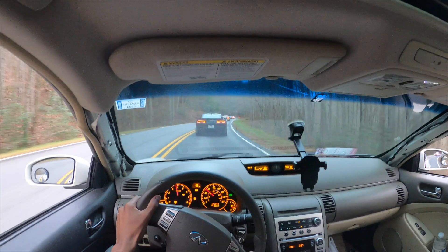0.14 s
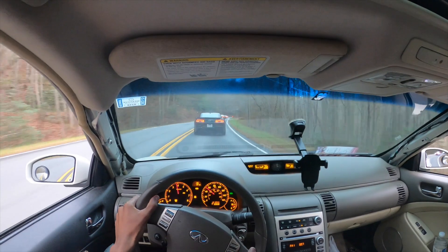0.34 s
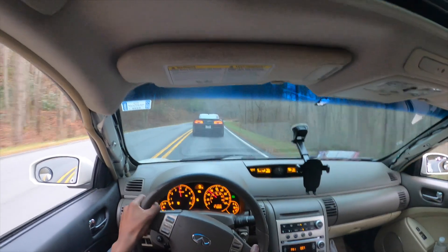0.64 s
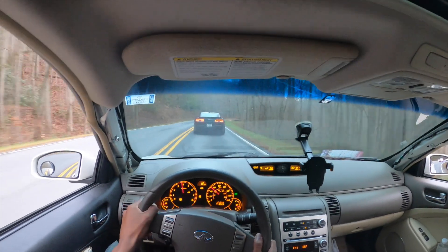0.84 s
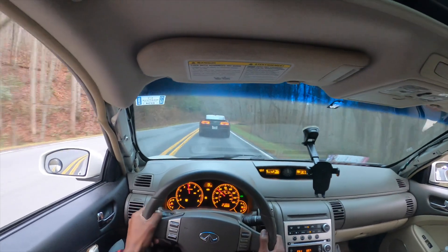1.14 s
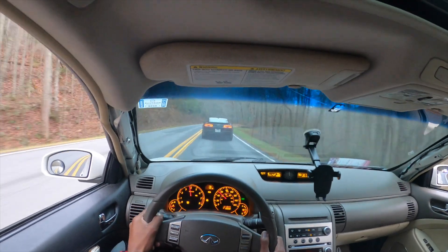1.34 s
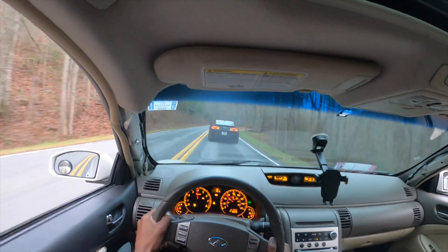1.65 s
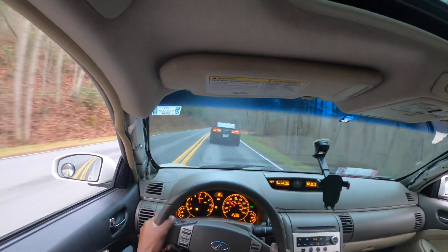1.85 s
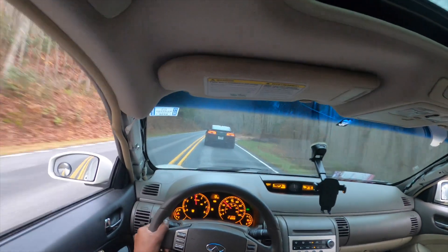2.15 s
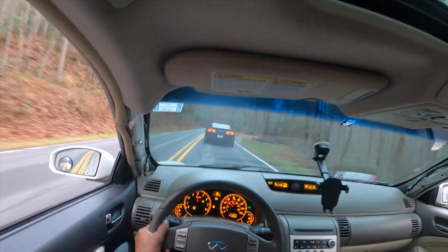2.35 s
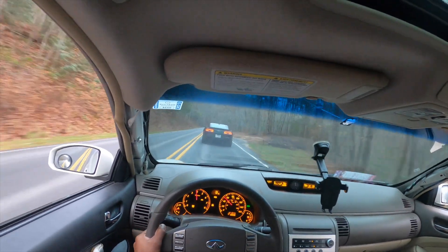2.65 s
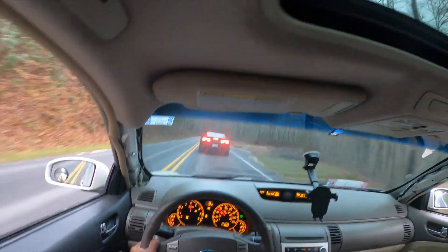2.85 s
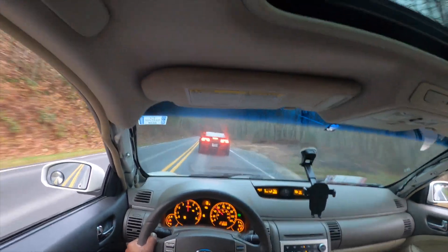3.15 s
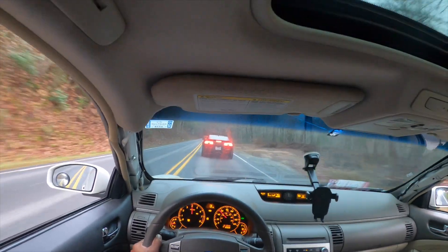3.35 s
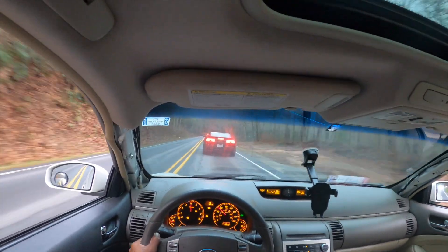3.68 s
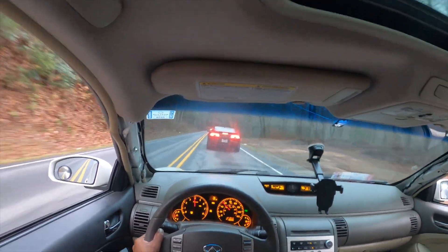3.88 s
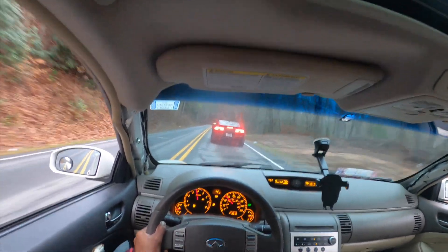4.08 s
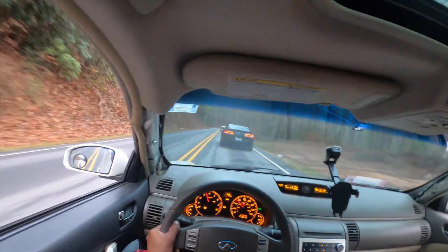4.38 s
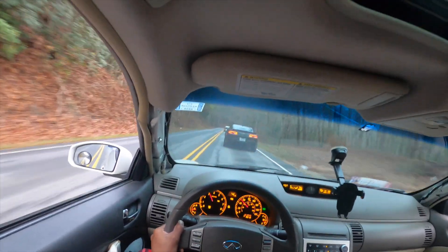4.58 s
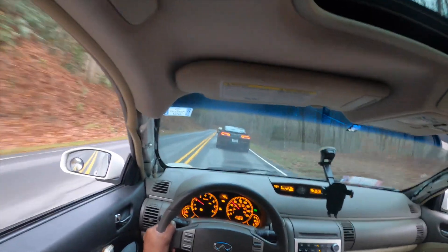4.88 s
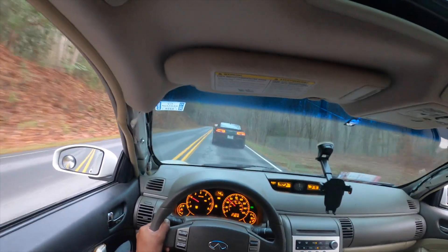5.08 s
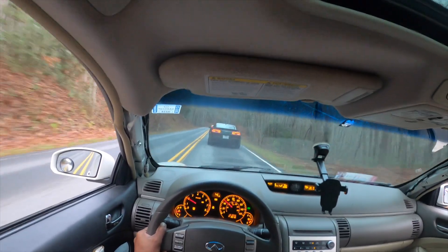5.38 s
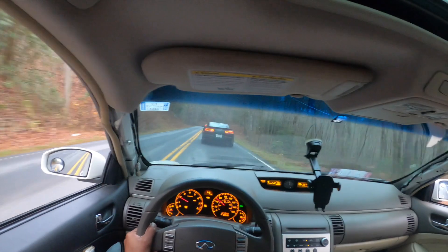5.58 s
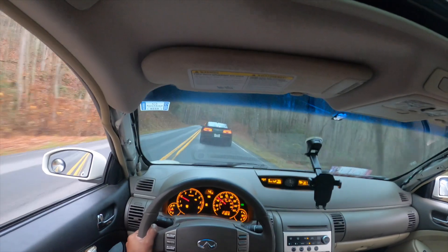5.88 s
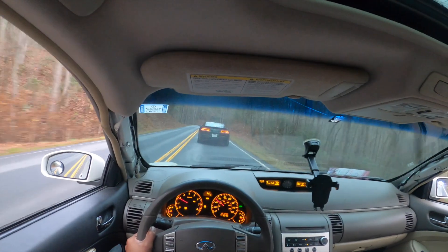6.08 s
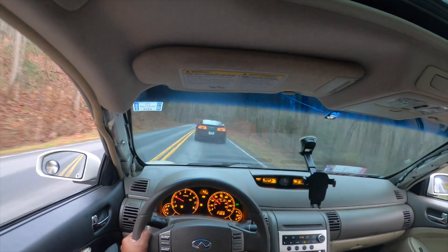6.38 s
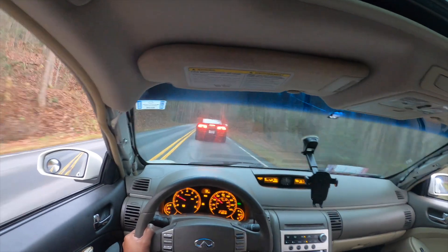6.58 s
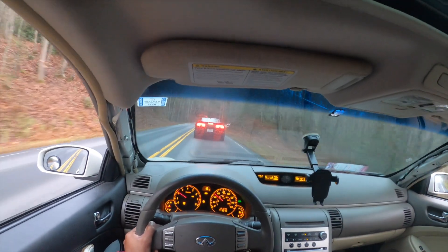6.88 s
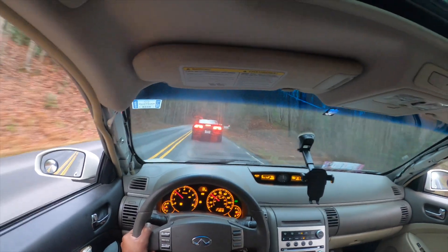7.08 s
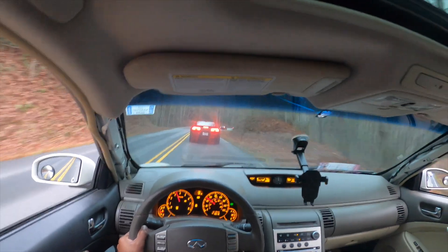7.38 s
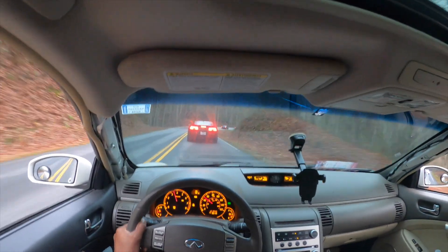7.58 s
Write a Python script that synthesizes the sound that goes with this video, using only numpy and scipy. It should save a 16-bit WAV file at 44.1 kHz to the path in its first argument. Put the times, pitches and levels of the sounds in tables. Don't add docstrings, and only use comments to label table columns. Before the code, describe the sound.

Cabin view of a brisk road drive: droning, raspy engine, rumbling road, rattling plastic, a hard crack, lower revs, then a late throttle stab.

```python
import sys
import numpy as np
from scipy import signal
from scipy.io import wavfile
from scipy.ndimage import uniform_filter1d

SR = 44100
rng = np.random.default_rng(int(sys.argv[2]) if len(sys.argv) > 2 else 0)


def undo_db(level):
    steps = np.asarray(level, float) / 20
    return 10 ** steps


def master_out(mix):
    frames = np.transpose(np.atleast_2d(mix))
    ceiling = np.clip(frames, -1, 1)
    pcm = np.round(ceiling * 32767).astype(np.int16)
    wavfile.write(sys.argv[1], SR, pcm)


N = 340893


def evened(x):
    return x / np.sqrt(np.mean(x ** 2) + 1e-20)


def read(points, hz):
    f, value = np.transpose(points)
    return np.interp(np.log(hz + 1), np.log(f + 1), value)


def curves(rows):
    s, *columns = np.transpose(rows)
    return [np.interp(np.arange(N) / SR, s, c, c[0], c[-1]) for c in columns]


def humps(rows):
    t = np.arange(N) / SR
    return sum(db * np.cos(np.pi / 2 * np.clip((t - s) / half, -1, 1)) ** 2 for s, half, db in rows)


def drift(seconds):
    coarse = rng.standard_normal(N // 64 + 2)
    size = max(int(seconds * SR / 64), 2)
    coarse = evened(uniform_filter1d(uniform_filter1d(coarse, size), size))
    return np.interp(np.arange(N) / 64, np.arange(len(coarse)), coarse)


def add(mix, s, sound):
    part = mix[..., round(s * SR):][..., :sound.shape[-1]]
    part += sound[..., :part.shape[-1]]


# f/Hz, left-right likeness [0-1]
LIKENESS = [(40, .95), (100, .9), (180, .97), (300, .82), (520, .86), (890, .78), (1520, .63), (2610, .5),
            (4500, .25), (9000, .3)]
# f/Hz, left minus right level/dB
LEAN = [(40, 1.2), (100, .6), (180, 1.2), (300, 2.5), (520, 3), (890, 4), (1520, 5), (2610, 5.5),
        (4500, 1.8), (9000, 1.8)]
# f/Hz, phase by which left leads [rad]
LEAD = [(40, -0.5), (180, -0.24), (600, -0.33), (1980, -1.2), (2760, -1.6)]


def bed(spectrum, patchy_db, size):
    hop = size // 4
    frames, hz = N // hop + 5, np.fft.rfftfreq(size, 1 / SR)
    a, b, c, d, patches = rng.standard_normal((frames, len(hz), 5)).T
    patches = uniform_filter1d(patches, size // 100, 0)
    patches = evened(uniform_filter1d(patches, 12000 // size, 1))
    same = np.clip(read(LIKENESS, hz), 0, 1)[:, None]
    left = a + 1j * b
    right = same * left + np.sqrt(1 - same ** 2) * (c + 1j * d)
    right = right * np.exp(-1j * read(LEAD, hz))[:, None]
    lean = undo_db(read(LEAN, hz) / 2)[:, None]
    colour = undo_db(read(spectrum, hz)[:, None] + patchy_db * patches)
    z = np.array([left * lean, right / lean]) * colour
    return evened(signal.istft(z, nperseg=size, noverlap=size - hop)[1][:, :N])


# t/s, firing tone level/dB, throttle [0-1]
LOAD = [(0, -12.5, 0.14), (.4, -15, 0.32), (1.8, -13.5, 0.3), (2.1, -11, 0.23), (2.3, -10, 0.3),
        (2.65, -10, 0.63), (2.9, -9.5, 0.67), (3.1, -17, 0.03), (3.3, -23, 0.37), (3.6, -19.5, 0.4),
        (3.9, -15, 0), (4.46, -16.5, 0.38), (4.63, -12.5, 1), (4.82, -14, 0.23), (6.95, -14, 0.26),
        (7.28, -11, 0.91), (7.46, -18.5, 0.6), (7.73, -18.5, .1)]
# t/s, half length [s], level/dB
LIFTS = [
    (1.93, 0.14, -9),
    (4.62, .065, -10.5),
    (6.76, 0.081, -11),
]
CRUISE_DB = -14


def firing():
    level_db, throttle = curves(LOAD)
    return level_db + humps(LIFTS), np.clip(throttle, 0, 1)


# t/s, firing rate f/Hz
SPEED = [(0, 175), (1.9, 176), (2.57, 182), (2.78, 190), (2.95, 184), (3.2, 187), (3.62, 185), (4.2, 170),
         (4.6, 146), (4.76, 115), (4.92, 99), (5.4, 93.3), (6.74, 94.5), (6.85, 106), (7.11, 125),
         (7.25, 150), (7.42, 166), (7.73, 156)]


def slowing(fall_hz_per_s):
    hz = uniform_filter1d(curves(SPEED)[0], size=4000)
    return np.clip(-np.gradient(hz) * SR / fall_hz_per_s, 0, 1)


RASP_ORDERS = (4, 5, 6, 7, 8)
# f/Hz, level/dB
PIPE = [(300, -32), (370, -25), (470, -29), (555, -23), (610, -40), (690, -40), (750, -27), (800, -28),
        (850, -41), (915, -27), (960, -37), (1100, -48), (1500, -40)]


def rasp(hz, throttle):
    closed_db = 24 * (1 - np.clip(throttle, 0, 1))
    overrun = slowing(80)
    lines = []
    for k in RASP_ORDERS:
        mute_db = 9 * overrun * np.clip(k * hz / 60 - 10, 0, 1)
        level_db = read(PIPE, k * hz) - closed_db - mute_db + 1.5 * drift(.1)
        lines.append((k, level_db, 1.5))
    return lines


# f/Hz, level/dB
MUFFLER = [(186, -28.5), (275, -35.5), (320, -46.5), (370, -37.5), (455, -41), (525, -39), (546, -42.5),
           (568, -38)]
# f/Hz, level/dB
BANKS = [(46, -37), (60, -41), (72, -41.5), (84, -28.5), (88, -28.5), (93, -34)]
# t/s, half length [s], level/dB
LUMPS = [
    (3.62, .26, 11.5),
    (5.8, 0.08, 8.5),
    (7.5, .1, 11),
]
UNEVEN_SIXTHS = (2, 4, 5, 8, 9)
UNEVEN_DB = [-13, -8, -9, -5, -8]


def engine():
    hz = uniform_filter1d(curves(SPEED)[0], size=900) * (1 + .0015 * drift(.12))
    firing_db, throttle = firing()
    falling = slowing(20)

    opened_db = 14.5 * throttle + 0.86 * (curves(LOAD)[0] - CRUISE_DB)
    second_db = read(MUFFLER, 2 * hz) + opened_db
    third_db = read(MUFFLER, 3 * hz) + opened_db - .5 - 5 * falling

    half_db = read(BANKS, hz / 2) - 1.8 * np.maximum(firing_db - CRUISE_DB, 0) + 2 * drift(0.11)
    half_db += humps(LUMPS) - 5 * falling

    # (multiple of the firing rate, level dB, flutter dB)
    lines = [
        (1, firing_db, 0.71),
        (2, second_db + 0.95 * drift(.08), 0.87),
        (3, third_db + 1.0 * drift(0.089), 1.6),
        (.5, half_db, 2.2),
        (2.5, np.minimum(third_db - 8, -41), 2.5),
        (3.5, np.minimum(third_db - 7, -39), 2.5),
    ]
    for k, db in zip(UNEVEN_SIXTHS, UNEVEN_DB):
        lines.append((k / 6, np.minimum(half_db, -28) + db, 2.5))
    lines += rasp(hz, throttle)

    turns = np.cumsum(hz * (1 + 0.0033 * drift(0.028))) / SR
    out = np.zeros((2, N))
    for k, level_db, flutter_db in lines:
        angle = 2 * np.pi * (k * turns + rng.random())
        mean_hz = k * np.mean(hz[:4 * SR])
        lean, lead = undo_db(read(LEAN, mean_hz) / 2), read(LEAD, mean_hz) / 2
        wave = np.array([lean * np.cos(angle + lead), np.cos(angle - lead) / lean])
        out += np.sqrt(2) * undo_db(level_db + flutter_db * drift(0.0087)) * wave
    return out


# t/s, side level/dB
WIDTH = [(0, -2), (4.3, -2.5), (4.47, -4), (4.5, -7), (4.65, -15), (4.8, -23.5), (5.0, -94), (7.73, -93.5)]


def wind_filter():
    return np.clip(-curves(WIDTH)[0] / 40, 0, 1)


# t/s, coarseness level/dB, undulation level/dB
SURFACE = [(0, 2, -9.5), (.3, 1.5, 3.5), (1.3, 4.5, 0.5), (1.9, 8, 0.5), (2.15, 5, -2), (2.55, -1.5, -4),
           (3.2, -1.5, -2), (3.6, 2.5, 0.5), (4.25, 1.5, 3.5), (4.6, 3, 7), (4.9, -1, -2), (5.6, 0.5, -6),
           (6.1, 0.5, 0), (6.85, 4.5, -3), (7.3, 2.5, -2), (7.62, -2, 4), (7.73, -4.5, 3)]
# t/s, half length [s], level/dB
DIPS = [
    (1.91, 0.073, 5),
    (4.65, 0.057, -3),
    (5.42, 0.15, 12),
    (7.73, 0.064, 6.5),
]
# f/Hz, level/dB per Hz
RUMBLE = [(8, -30), (14, -13), (20, -5), (26, 0), (30, -3), (36, -7), (47, -11), (58, -20), (90, -50),
          (300, -130)]
# f/Hz, level/dB per Hz
BOOM = [(35, -28.5), (55, -4), (90, -2.5), (130, 5.5), (200, -4.5), (270, -12), (340, -10), (450, -20),
        (800, -40), (2000, -120)]
# f/Hz, level/dB per Hz
ROAR = [(120, -34.5), (270, -2.5), (400, 2), (540, 0), (640, -5.5), (740, -2), (840, -9), (1050, -6),
        (1400, -15.5), (2200, -37.5), (4000, -58), (8000, -110)]
# f/Hz, level/dB per Hz
HISS = [(700, -30), (1500, 0), (2200, -5), (3000, -11), (4400, -19), (6000, -26), (7600, -31), (8500, -38),
        (11000, -48), (12500, -52), (14000, -61), (16000, -80)]


def road():
    coarse_db, wavy_db = curves(SURFACE)
    firing_db, throttle = firing()
    rumble_db = -24.5 + wavy_db + humps(DIPS) + 1.2 * drift(.06)
    boom_db = -28 + 0.65 * wavy_db - .6 * (firing_db - CRUISE_DB) + 0.72 * drift(0.14)
    roar_db = -37.5 + coarse_db + 0.29 * humps(DIPS)
    hiss_db = -42.5 + .4 * coarse_db - 4.5 * wind_filter() + 0.7 * throttle
    low = undo_db(rumble_db + 1.5) * bed(RUMBLE, patchy_db=0.0, size=4096)
    low += undo_db(boom_db) * bed(BOOM, patchy_db=0.5, size=2048)
    high = undo_db(roar_db + 7.5) * bed(ROAR, patchy_db=1.1, size=1024)
    high += undo_db(hiss_db + 2.5 + 0.77 * drift(0.037)) * bed(HISS, patchy_db=-1.3, size=512)
    return low + high


# f/Hz, level/dB per Hz
WIND = [(2000, -31), (3500, -3), (5000, 1.5), (7200, -5), (8300, -14.5), (11000, -33)]


def wind():
    level_db = -61 - .5 * (firing()[0] - CRUISE_DB) - 13 * wind_filter() + 1.2 * drift(.1)
    return undo_db(level_db) * bed(WIND, patchy_db=.8, size=512)


# t/s, peak level/dB, ring f/Hz
CLICKS = [(1.302, -26, 2720), (1.3536, -32, 3020), (1.3644, -31, 2770), (1.5898, -32, 3040),
          (1.5993, -32, 2960), (1.693, -30, 3500), (1.752, -27, 3210), (1.968, -30, 3500),
          (5.3542, -18, 3300), (5.4111, -32, 2800), (5.4323, -17, 3750), (5.4429, -33.5, 3800)]
# t/s, length [s], period [s], peak level/dB, ring f/Hz
RATTLES = [
    (1.629, .37, .0392, -20.5, 2950),
    (3.417, .25, .0398, -33, 3050),
]


def struck():
    rows = list(CLICKS)
    for start, length, period, db, hz in RATTLES:
        s = np.arange(0, length, period)
        for lag, drop_db in [(0, 0), (.0095, -1)]:
            u = rng.standard_normal((20, 3))[:len(s)].T
            times = start + s + lag + .0006 * u[0]
            peaks_db = db + drop_db - 4 * s / length + 1.5 * u[1]
            rows += zip(times, peaks_db, hz + 170 * u[2])
    return rows


def ticks():
    out, t = np.zeros((2, N)), np.arange(3000) / SR
    hits = struck()
    chance = rng.standard_normal((len(hits), 2, 2, len(t)))
    halo = .045 * np.hanning(len(t))
    for (s, db, hz), (noise, smear) in zip(hits, chance):
        ring = np.sin(2 * np.pi * hz * t)
        ring += 0.64 * np.sin(2 * np.pi * 1.3 * hz * t) + 0.15 * np.sin(2 * np.pi * 1.65 * hz * t)
        ring *= undo_db(-60 * t / .005) * np.minimum(t / .0003, 1)
        buzz = noise * (0.5 * undo_db(-60 * t / 0.0048) + 0.073 * undo_db(-60 * t / 0.078))
        trim = signal.butter(3, [.6 * hz, 1.85 * hz], "band", fs=SR, output="sos")
        tick = ring * undo_db([[1.5], [-1.5]]) + buzz
        add(out, s, undo_db(db - 0.5) * signal.sosfilt(trim, tick))
        add(out, s - t[-1] / 2, undo_db(db + 3.0) * signal.sosfilt(trim, halo * smear))
    return out


# t/s, peak level/dB, ring f/Hz, t60 [s], crack level/dB
BUMPS = [
    (1.38, -11, 193.5, 0.22, -49),
    (1.84, -6, 125.5, 0.27, -44.5),
    (3.821, -5, 160, 0.3, -39.5),
    (4.275, -29, 303, 0.045, -22.5),
    (4.283, -27, 223, 0.042, -15),
    (4.288, -24, 396, 0.032, -21),
    (6.508, -9, 133, 0.15, -41.5),
    (6.542, -9.5, 241, 0.11, -17.5),
    (7.39, -5, 90.5, 0.63, -40),
]


def bumps():
    out, t = np.zeros((2, N)), np.arange(16000) / SR
    chance = rng.standard_normal((len(BUMPS), 2, len(t)))
    dull = signal.butter(3, 1250, fs=SR, output="sos")
    for (s, db, hz, t60, crack_db), noise in zip(BUMPS, chance):
        swell = 1 - np.exp(-12 * t / t60)
        ring = undo_db(db - 60 * t / t60) * swell * np.sin(2 * np.pi * hz * t)
        knock = signal.sosfilt(dull, noise * undo_db(crack_db + 17 - 60 * t / 0.021))
        add(out, s, ring + knock)
    return out


# t/s, rise [s], hold [s], release [s], level/dB
BLIPS = [
    (2.499, .2, 0.21, .18, -60.5),
    (7.191, .03, 0.1, 0.16, -58.5),
]
# f/Hz, level/dB per Hz
AIR = [(1000, -60), (2500, -14), (3700, -5), (4400, 0), (5200, -7), (6000, -10), (7000, -8), (8500, -14),
       (9500, -15), (11000, -21), (12500, -24), (14000, -31), (16000, -45)]


def intake():
    t, gain = np.arange(N) / SR, 0
    shape_db = np.array([-38.5, -12, -1.0, 4.0, -16.5, -38.5])
    for s, rise, hold, release, db in BLIPS:
        corners = np.cumsum([-.05, .05, rise, hold, release, .05])
        gain = gain + undo_db(np.interp(t - s, corners, db + shape_db))
    return gain * undo_db(10.5) * bed(AIR, patchy_db=2.7, size=512)


# t/s, f/Hz, level/dB
HUM = [(0, 47, -60), (3.3, 47, -50), (3.55, 46, -25), (4.2, 43, -23), (4.55, 40, -24), (4.8, 38, -50),
       (7.73, 38, -60)]


def driveline():
    hz, level_db = curves(HUM)
    turn = 2 * np.pi * np.cumsum(hz) / SR
    return np.sqrt(2) * undo_db(level_db + 1.3 * drift(0.074)) * np.cos(turn)


# t/s, peak level/dB, length [s]
KNOCKS = [
    (4.2765, -25, 0.00033),
    (4.2824, -11, 0.00014),
    (4.2836, -8.5, 0.00017),
    (4.2877, -4, 0.00036),
    (5.3545, -12, 0.00024),
    (6.546, -12, 0.00045),
    (6.549, -17, 0.00041),
]


def knocks():
    out, t = np.zeros(N), np.arange(3000) / SR
    for s, db, length in KNOCKS:
        add(out, s, undo_db(db) * np.e * t / length * np.exp(-t / length))
    return signal.sosfilt(signal.butter(4, 4200, fs=SR, output="sos"), out)


# t/s, peak level/dB, t60 [s]
SNAPS = [
    (5.354, -50, 0.035),
    (6.538, -59, .06),
    (6.556, -55.5, .06),
    (6.575, -58.5, .06),
    (6.589, -55, 0.056),
    (6.6, -57, .08),
]


def snaps():
    out, t = np.zeros(N), np.arange(3000) / SR
    thin = signal.butter(2, [8000, 12200], "band", fs=SR, output="sos")
    for (s, db, t60), noise in zip(SNAPS, rng.standard_normal((len(SNAPS), len(t)))):
        add(out, s, signal.sosfilt(thin, noise * undo_db(db - 60 * t / t60)))
    return out


def scene():
    steady = engine() + road() + wind()
    return steady + ticks() + bumps() + intake() + driveline() + knocks() + snaps()


def top_cut(x):
    return signal.sosfilt(signal.butter(12, 15600, fs=SR, output="sos"), x)


# t/s, half length [s]
DROPOUT = (4.018, .007)
# t/s, half length [s], level/dB
DUCKS = [
    (4.31, .035, -5),
]


def record(dry):
    mid = (dry[0] + dry[1]) / 2
    side = (dry[0] - dry[1]) / 2 * undo_db(curves(WIDTH)[0])
    centre, half = DROPOUT
    gap = np.clip(abs(np.arange(N) / SR - centre) / half, .2, 1)
    x = np.array([mid + side, mid - side]) * gap ** 2 * undo_db(humps(DUCKS))
    mix = 1.18 * np.tanh(x / 1.101)
    return top_cut(mix)


dry = scene()
out = record(dry)
master_out(out)
```